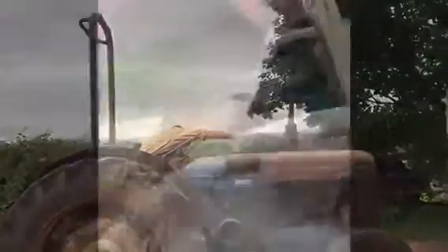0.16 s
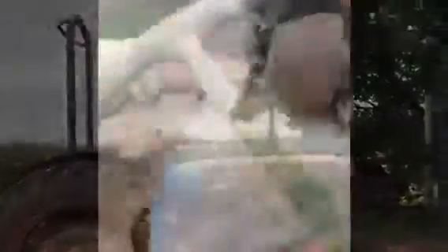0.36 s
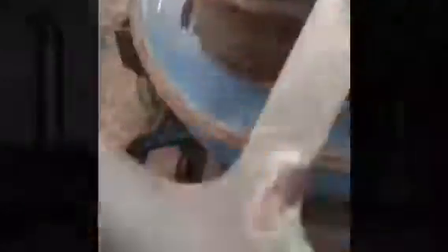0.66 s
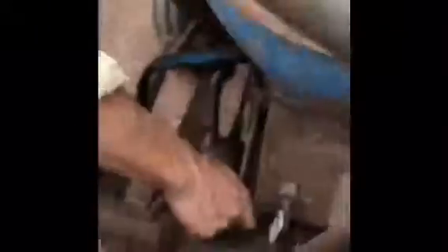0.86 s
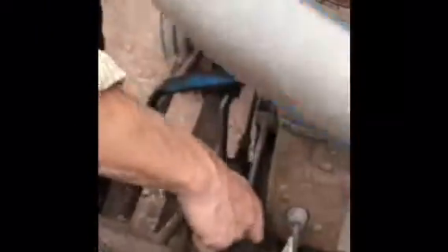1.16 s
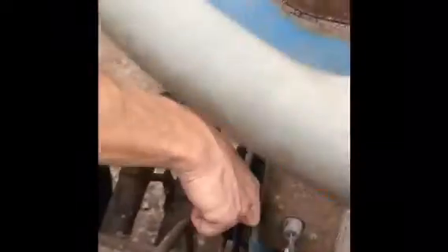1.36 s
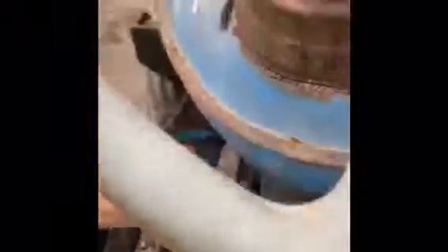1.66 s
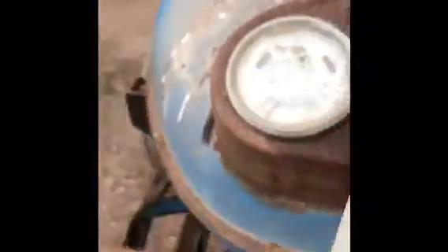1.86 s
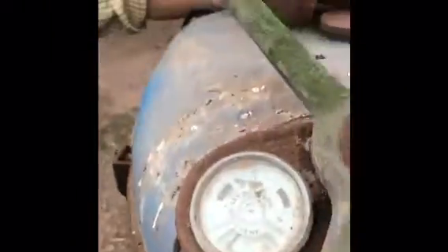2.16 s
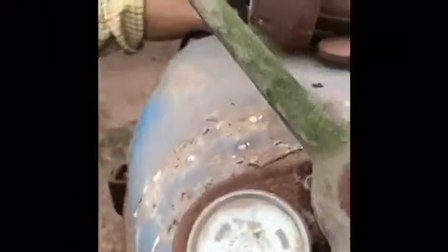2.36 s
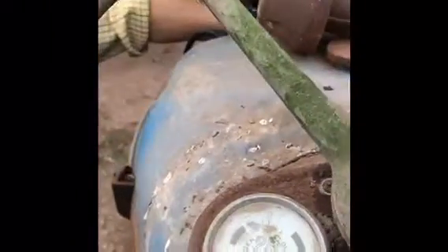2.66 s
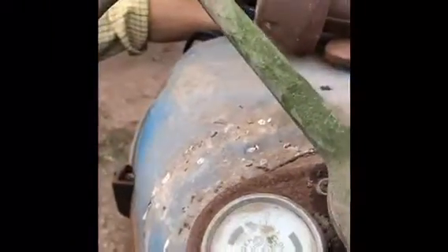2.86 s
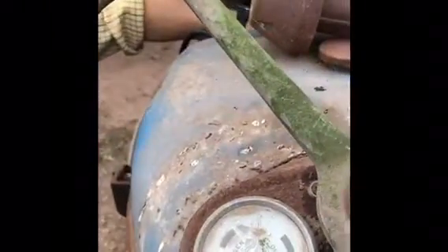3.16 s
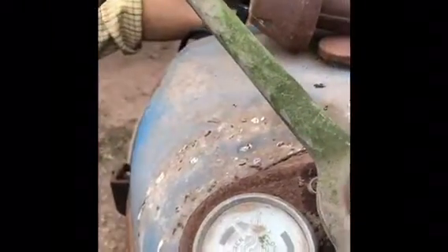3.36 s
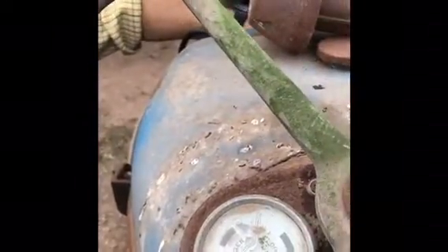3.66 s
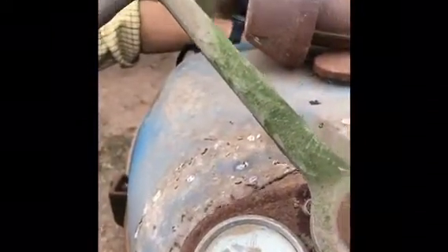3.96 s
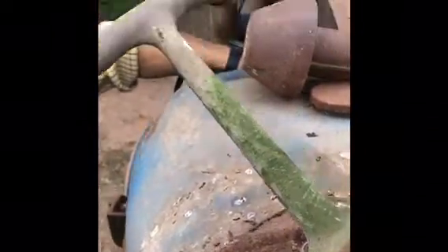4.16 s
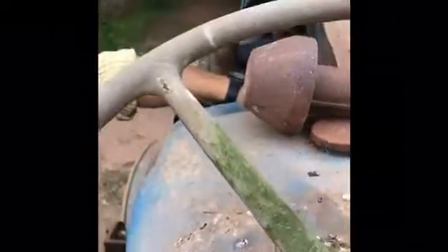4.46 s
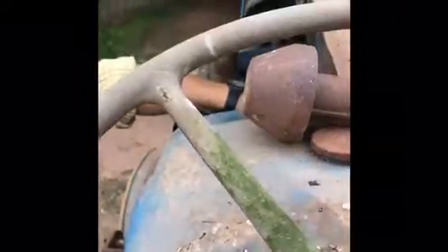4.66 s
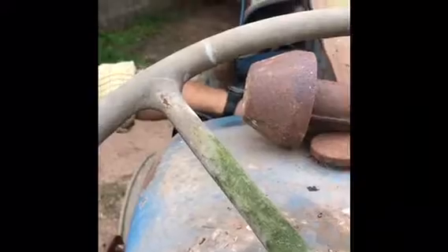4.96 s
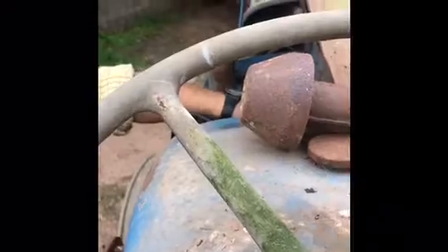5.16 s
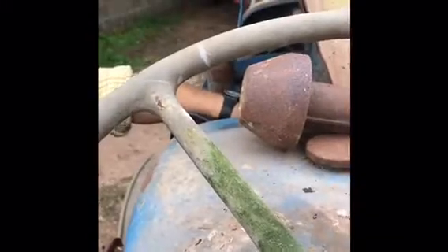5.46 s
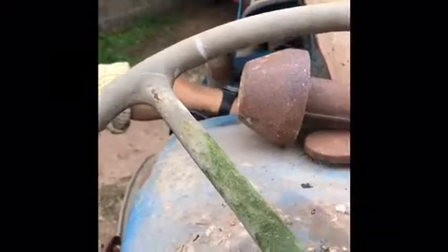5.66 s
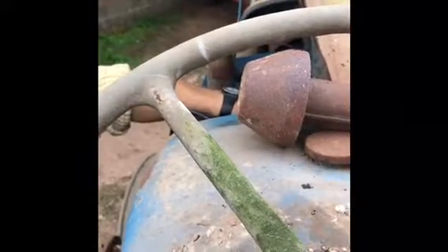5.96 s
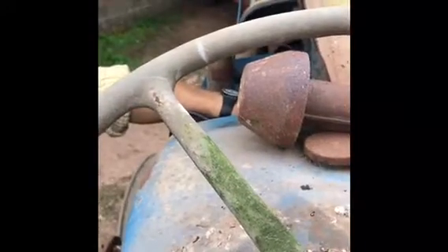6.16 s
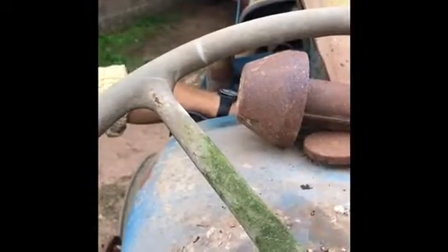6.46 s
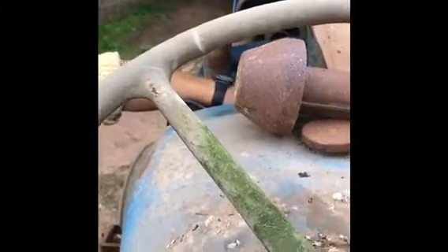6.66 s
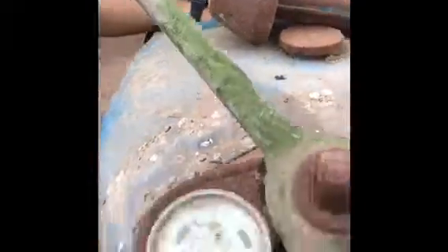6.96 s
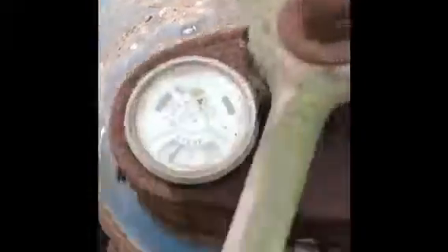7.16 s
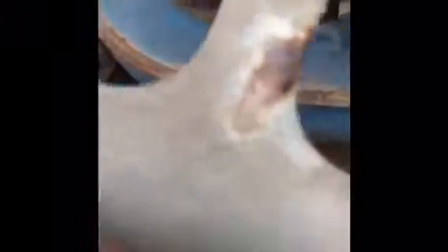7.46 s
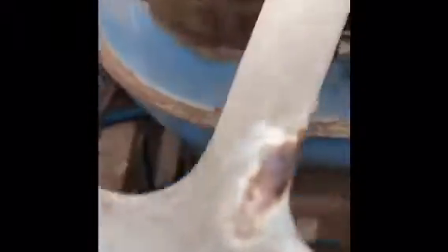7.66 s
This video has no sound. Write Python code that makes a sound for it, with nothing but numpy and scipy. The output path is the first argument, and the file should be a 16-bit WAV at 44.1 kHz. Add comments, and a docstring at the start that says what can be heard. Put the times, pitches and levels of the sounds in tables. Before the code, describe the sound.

An old tractor fails to start outdoors: a scraping lever, then brief bursts of starter whirr with clunks, iron hum and harsh gear grinding.

```python
"""A quiet farmyard, heard from the seat of an old tractor that is being tried on its starter.
A rusty lever scrapes, drops and bounces to rest. Again and again the starter clunks in, whirrs and
coasts down in the humming iron casing. Twice its pinion grinds loudly on the ring gear; dry teeth
squeal, small parts tick and a few compressions thud in the manifold. A small bird chirps far off."""
import sys
import numpy as np
from scipy import signal
from scipy.io import wavfile
from scipy.ndimage import uniform_filter1d

SR = 44100
rng = np.random.default_rng(int(sys.argv[2]) if len(sys.argv) > 2 else 0)


def store_wav(level_fs):
    """Save 16-bit WAV to argv[1]."""
    pcm = np.round(np.clip(np.atleast_2d(level_fs), -1, 1) * 32767)
    wavfile.write(sys.argv[1], SR, pcm.T.astype(np.int16))


N = 343523
TIME = np.arange(N) / SR
HZ = np.fft.rfftfreq(16384, 1 / SR)
TURNS_PER_S = 50  # armature speed under power

# The starter is switched on. Each row: start and length in seconds; relative levels in dB of gear whirr,
# brush rasp, low drone and upper drone; drop of whirr and rasp on release in dB; rasp fade and
# upper drone ring-out in dB per second.
TRIES = [(1.91, 0.33, -41, -53.5, -43, -33.5, 2.5, 18.5, 36),
         (2.695, .114, -38, -36, -37, -27.5, 12.5, 66, 30),
         (3.458, .52, -30, -43.5, -38, -26.5, 11, 27.5, 38),
         (5.322, .08, -32, -52, -35.5, -38, 6, 38.5, 31.5),
         (5.399, .71, -25.5, -40.5, -29.5, -30.5, 25, 47.5, 24),
         (7.461, 0.36, -28.5, -40.5, -36.5, -24, 10, 29, 36.5)]
# A piston comes over compression. Each row: start in seconds, peak in dB, centre pitch in Hz,
# length in seconds.
COMPRESSIONS = [(3.685, -27, 71, 0.21), (3.917, -26.5, 75, 0.16), (5.568, -30.5, 69, 0.18),
                (7.684, -26.5, 69, 0.66)]


def amp(db):
    """Decibels to gain."""
    return 10 ** (np.asarray(db) / 20)


def unit(x):
    """Scales to rms 1."""
    return x / np.sqrt(np.mean(x ** 2) + 1e-20)


def wobble(smoothing, n=N):
    """Random movement of rms 1, averaged over `smoothing` samples."""
    return unit(uniform_filter1d(rng.standard_normal(n), size=smoothing))


def curve(points, hz=HZ):
    """Joins (Hz, value) points along a log-frequency axis."""
    f, value = np.transpose(points)
    return np.interp(np.log(hz + 1), np.log(f + 1), value)


def add(mix, s, sound):
    """Mixes a sound in at s seconds."""
    part = mix[max(round(s * SR), 0):][:len(sound)]
    part += sound[:len(part)]


def envelope(start, length, db, rise_s, climb, fall, drop_db=0, release_s=0.018):
    """Attack, a sloping hold, then a quick drop and a steady fade; climb and fall are in dB per second."""
    held = np.clip(TIME - start, 0, length)
    after = np.maximum(TIME - start - length, 0)
    dropped_db = drop_db * (1 - np.exp(-after / release_s))
    return (1 - np.exp(-held / rise_s)) * amp(db + climb * held - fall * after - dropped_db)


def colour(x, db):
    """Minimum-phase EQ of unit energy: the dB curve sets only the tone."""
    log_gain = np.log(amp(np.maximum(db - db.max(), -100)))
    mirrored = np.concatenate([log_gain, log_gain[-2:0:-1]])
    response = np.fft.ifft(np.exp(np.conj(signal.hilbert(mirrored)))).real[:len(HZ) // 2]
    return signal.oaconvolve(x, response / np.linalg.norm(response))[:N]


def iron(x, eq, ring_db, thicket_db=-5, thicket_t60=0.082):
    """Sound passes through the castings: strong modes and a thicket of weak ones, over a broad EQ."""
    # Flywheel and bell housing ring. Each row: pitch in Hz, width in Hz, relative level in dB.
    modes = [(363, 30, -3), (550, 30, -7), (680, 35, -2), (888, 40, 2.5), (985, 40, -3), (1284, 40, 6),
             (1828, 26, -3), (2550, 44, -2), (3280, 65, 0), (3476, 45, -1), (3765, 50, -4), (3875, 80, -3),
             (4212, 70, -3), (4700, 100, -5)]
    peaks = sum(amp(db + ring_db) ** 2 / (1 + (2 * (HZ - hz) / width) ** 2) for hz, width, db in modes)
    thicket = rng.standard_normal(SR // 5) * amp(-60 * TIME[:SR // 5] / thicket_t60)
    rung = x + amp(thicket_db) * signal.oaconvolve(x, thicket / np.linalg.norm(thicket))[:N]
    return colour(rung, curve(eq) + 10 * np.log10(1 + peaks)) / np.hypot(1, amp(thicket_db))


def grit(per_s, spread_db, smooth):
    """Tiny metal contacts of uneven size over a share of even friction noise."""
    clicks = (rng.random(N) < per_s / SR) * rng.choice([-1., 1.], N)
    sizes = amp(spread_db * np.minimum(rng.exponential(1, N), 3))
    return unit(unit(clicks * sizes) + smooth * rng.standard_normal(N))


def blows(hits, rise_s, decay_s):
    """Each hit, given as (seconds, dB), is a short, dying chatter of contacts."""
    out, t = np.zeros(N), TIME[:SR // 5]
    shape = (1 - np.exp(-t / rise_s)) * np.exp(-t / decay_s)
    for s, db in hits:
        add(out, s, amp(db) * shape / shape.max() * rng.standard_normal(len(t)))
    return out


def switched_on(tries, hang_s=0):
    """True while the starter switch is held, and for hang_s afterwards."""
    return np.any([(TIME > s) & (TIME < s + length + hang_s) for s, length, *_ in tries], axis=0)


def background():
    """Outdoor air and low rumble, plus thin recorder hiss that cuts in and out around the later tries."""
    # Tone of the air and of the rumble. Each row: frequency in Hz, relative level in dB.
    air_eq = [(25, -16.5), (115, 3), (165, -14), (300, -14.5), (600, -24), (1000, -25), (1800, -37),
              (7000, -43), (16000, -50)]
    rumble_eq = [(25, -24), (62, -4.5), (105, -1), (170, -20.5), (400, -61)]
    air, rumble, hiss = rng.standard_normal((3, N))
    hiss_gate = uniform_filter1d(switched_on(TRIES[1:], hang_s=0.4).astype(float), size=220)
    bed = amp(-49.5) * colour(air, curve(air_eq)) + amp(-59) * colour(rumble, curve(rumble_eq))
    return bed + amp(-66) * hiss * hiss_gate


def lever(ring_hz=3524, ring_half_width_hz=210, catches_per_s=5.8, first_catch_s=0.15, catch_db=9):
    """A rusty lever scrapes along in uneven slips, singing where it catches; the linkage rubs."""
    # The lever slides. Each row: start and length in seconds, relative level in dB, sag in dB per second.
    strokes = [(0, 0.43, -31.5, 11.5), (0.478, 0.27, -35.5, 40.5)]
    # Tone of the scrape. Each row: frequency in Hz, relative level in dB.
    scrape_eq = [(18, -41), (30, -3), (112, -8), (227, -5.5), (374, -4), (702, -3.5), (2120, -9),
                 (3490, -5), (7670, -27.5), (12300, -40), (16000, -39)]
    # The linkage shudders. Each row: midpoint in seconds, relative level in dB, length in seconds.
    rubs = [(1.25, -56.5, 0.056), (1.583, -70, 0.15), (2.172, -39, 0.046), (4.099, -38.5, 0.12),
            (4.279, -35.5, 0.12), (4.41, -44, 0.15), (4.919, -56.5, 0.04), (4.992, -54, 0.06)]
    slips = amp(1.96 * wobble(900))
    push = sum(envelope(s, length, db, rise_s=0.0013, climb=-sag, fall=170)
               for s, length, db, sag in strokes)
    friction = grit(per_s=900, spread_db=-0.5, smooth=0.84) * slips * push
    scrape = iron(friction, scrape_eq, ring_db=-4, thicket_db=-7)
    catches = amp(catch_db * np.cos(2 * np.pi * catches_per_s * (TIME - first_catch_s)))
    resonance_db = -20 * np.log10(1 + ((HZ - ring_hz) / ring_half_width_hz) ** 2)
    ring = colour(rng.standard_normal(N) * push * catches, resonance_db)
    pressure = np.zeros(N)
    for s, db, length in rubs:
        add(pressure, s - length / 2, amp(db) * signal.windows.hann(int(length * SR)))
    rub_eq = [(150, -5), (300, 1.5), (1100, -2), (2000, -11), (3800, -11.5), (8000, -31.5), (16000, -48.5)]
    rubbing = colour(pressure * grit(per_s=3000, spread_db=2.5, smooth=0.7), curve(rub_eq))
    return amp(-1) * scrape + amp(-11) * ring + amp(3) * rubbing


def bounces(drop_s=0.622, first_hop_s=0.085, hop_share=0.87, first_db=-14.5, loss_db=9):
    """The dropped lever bounces to rest, each hop shorter and weaker: hits as (seconds, dB)."""
    return [(drop_s + first_hop_s * sum(hop_share ** j for j in range(k)), first_db - loss_db * k)
            for k in range(5)]


def knocks(body_dynamics=0.646):
    """Linkage and lever knock with a bright clack and a dull body; in light knocks the body takes over."""
    # The linkage knocks. Each row: start in seconds, relative level in dB.
    linkage_hits = [(.018, -21.5), (.474, -32), (.514, -21.5), (1.407, -44.5), (1.854, -47), (4.793, -48),
                    (7.311, -51)]
    # Tone of the clack. Each row: frequency in Hz, relative level in dB.
    clack_eq = [(120, -28), (200, -18), (612, -12.5), (1250, 3), (1980, -7), (2560, -5.5), (3560, -14),
                (4770, -17.5), (6280, -18), (16000, -35)]
    body_eq = [(150, -11), (350, -5), (1100, 1.5), (2500, -25), (8000, -52)]
    hits = linkage_hits + bounces()
    clack = colour(blows(hits, rise_s=0.0003, decay_s=0.013), curve(clack_eq))
    body_hits = [(s, body_dynamics * db) for s, db in hits]
    body = colour(blows(body_hits, rise_s=0.001, decay_s=0.0082), curve(body_eq))
    return amp(-4.5) * clack + amp(-20.5) * body


def ticks(count=12, gap_s=0.036, spread_db=1.5):
    """The starter switch sparks and small parts tick, singly or in faint, uneven rattles."""
    # Single sharp ticks. Each row: start in seconds, relative level in dB.
    singles = [(.506, -27.5), (.621, -27), (1.888, -41), (1.919, -30.5), (2.075, -26), (3.431, -21.5),
               (3.676, -30), (3.904, -23.5), (3.936, -23), (5.103, -47), (5.245, -48), (5.279, -40),
               (5.309, -39.5), (6.556, -53), (7.112, -61), (7.449, -31.5), (7.679, -29.5)]
    # Spells of loose ticking. Each row: start and length in seconds, relative level in dB.
    rattles = [(0.126, .27, -32.5), (5.021, .19, -50)]
    # Tone of the ticks. Each row: frequency in Hz, relative level in dB.
    tick_eq = [(600, 0), (2000, -5.5), (5000, 1), (7500, -0.5), (10000, -5), (13000, -2), (16000, -7)]
    loose = []
    for s, length, db in rattles:
        delays = gap_s * (np.arange(count) + rng.random(count))
        levels = db + spread_db * rng.standard_normal(count)
        loose += [(s + delay, level) for delay, level in zip(delays, levels) if delay < length]
    clicks = blows(singles, rise_s=0.0014, decay_s=0.0055) + blows(loose, rise_s=0.0006, decay_s=0.0025)
    return amp(-6) * colour(clicks, curve(tick_eq))


def bird():
    """A far-off bird: short buzzy chirps that narrow to one thin note."""
    # Each row: start in seconds, relative level in dB, pitch in Hz.
    chirps = [(1.572, -52, 7560), (1.718, -50.5, 7100), (4.45, -53, 7300), (4.99, -59, 7100),
              (6.759, -67, 7240)]
    out, t = np.zeros(N), TIME[:SR // 6]
    shape = (1 - np.exp(-t / 0.015)) * np.exp(-t / 0.039)
    for s, db, hz in chirps:
        buzz_hz = 700 * np.exp(-t / 0.09) * wobble(40, len(t))
        add(out, s, amp(db) * shape * np.sin(2 * np.pi * np.cumsum(hz + buzz_hz) / SR))
    return amp(2.5) * out


def armature_turns(coast_s=0.7):
    """Turns made by the armature: full speed under power, running down after each try."""
    spin = [(TIME >= s) * np.exp(-np.maximum(TIME - s - length, 0) / coast_s) for s, length, *_ in TRIES]
    return np.cumsum(TURNS_PER_S * np.max(spin, axis=0)) / SR


def starter(rise_s=0.0035, strain_delay_s=0.14, strain_width_s=0.05):
    """Gears whirr and brushes rasp, swelling once a turn and labouring just after a compression begins."""
    # Tone of the gears and of the brushes. Each row: frequency in Hz, relative level in dB.
    whirr_eq = [(150, -32.5), (310, -3.5), (420, -9.5), (480, -9), (750, -8), (1450, -10.5), (1750, -16.5),
                (2100, -28), (4000, -56.5)]
    rasp_eq = [(1200, -24.5), (2100, -4.5), (2600, 2), (3700, -2.5), (4800, -10), (6500, -16), (9000, -29),
               (11000, -38), (16000, -45)]
    gears, brushes = np.zeros((2, N))
    for s, length, whirr_db, rasp_db, _, _, drop_db, rasp_fade, _ in TRIES:
        gear_gain = envelope(s, length, whirr_db, rise_s, climb=1, fall=26, drop_db=drop_db)
        brush_gain = envelope(s, length, rasp_db, rise_s, climb=18, fall=rasp_fade, drop_db=drop_db)
        gears = np.where(TIME < s, gears, gear_gain)
        brushes = np.where(TIME < s, brushes, brush_gain)
    strain = sum(np.exp(-((TIME - s - strain_delay_s) / strain_width_s) ** 2) for s, *_ in COMPRESSIONS)
    strain *= switched_on(TRIES)
    churn_db = 1.3 * wobble(1300)  # the dry gears run unevenly
    turn = np.cos(2 * np.pi * armature_turns())
    gears *= amp(2.5 * strain + churn_db) * (1 + 0.067 * turn)
    brushes *= amp(4 * strain + churn_db) * (1 + 0.24 * turn)
    whirr = iron(grit(per_s=2000, spread_db=3, smooth=0.82) * gears, whirr_eq, ring_db=1.5, thicket_db=-6)
    rasp = iron(grit(per_s=3600, spread_db=3.5, smooth=0.24) * brushes, rasp_eq, ring_db=-0.5)
    # On the first try the starter spins free and sizzles.
    free_spin = envelope(*TRIES[0][:2], db=-57.5, rise_s=rise_s, climb=17, fall=29)
    sizzle_eq = [(2500, -10.5), (6000, -3.5), (9000, -14.5), (10500, -21)]
    sizzle = colour(rng.standard_normal(N) * free_spin, curve(sizzle_eq))
    return amp(1) * whirr + amp(-1) * rasp + sizzle


def boom(modes, evenness, free_waver=0.3, frame_hz=500):
    """Narrow modes waver while the starter shakes them, and ring on more purely once it is let go."""
    waver_clock = frame_hz * (1 + np.cumsum(np.where(switched_on(TRIES), 1, free_waver)) / SR)
    frames, ring = np.arange(frame_hz * (N // SR + 2)), np.zeros(N)
    for hz, width, db in modes:
        pole = np.exp(-2 * np.pi * width / frame_hz)
        shake = rng.standard_normal(len(frames)) + 1j * rng.standard_normal(len(frames))
        drift = signal.lfilter([1], [1, -2 * pole, pole * pole], shake)
        tone = np.interp(waver_clock, frames, drift) * np.exp(2j * np.pi * hz * TIME)
        ring += amp(db) * unit(tone.real)
    power = uniform_filter1d(uniform_filter1d(ring ** 2, size=3000), size=3000)
    return unit(ring / power ** (evenness / 2))  # partly levels out the swells


def casing(rise_s=0.03, low_fade_share=0.66):
    """Casing and bonnet drone along with each try and ring out, the low modes dying more slowly."""
    # Their booming modes. Each row: pitch in Hz, width in Hz, relative level in dB.
    low_modes = [(93.2, 14, -11.5), (111.9, 6.9, -8.5), (142.8, 6.7, 0)]
    upper_modes = [(177.5, 5.4, -6.5), (204.1, 6.5, -0.5), (229.4, 9.8, -5.5), (307.5, 11, -8),
                   (357, 14, -14), (684, 4.9, -19.5), (934, 8, -23.5), (977, 5.4, -23.5)]
    low_gain, upper_gain = np.zeros((2, N))
    for s, length, _, _, low_db, upper_db, _, _, ring_out in TRIES:
        low_swell = envelope(s, length, low_db, rise_s, climb=0, fall=low_fade_share * ring_out)
        upper_swell = envelope(s, length, upper_db, rise_s, climb=0, fall=ring_out, drop_db=1.5)
        low_gain = np.maximum(low_gain, low_swell)
        upper_gain = np.maximum(upper_gain, upper_swell)
    low = boom(low_modes, evenness=0.64) * low_gain
    upper = boom(upper_modes, evenness=0.43) * upper_gain
    return amp(-1.7) * low + amp(-1.3) * upper


def clunks(shelf_hz=2200):
    """The starter drive is thrown in and hits its stop; harder throws are brighter."""
    # Each row: start in seconds, relative level in dB, decay in seconds, treble shelf in dB.
    throws = [(1.912, -26.5, 0.0093, -10), (3.447, -18, 0.0086, -7.5), (5.333, -41, .012, -14.5),
              (5.405, -30, 0.012, -13.5), (7.462, -17, 0.0043, 11)]
    # Tone of a clunk before the shelf. Each row: frequency in Hz, relative level in dB.
    clunk_eq = [(71, -38), (120, -6), (300, -2.5), (546, -6), (684, 0.5), (1160, -4), (1290, -6),
                (1430, -19), (1650, -6), (1940, -19), (3590, -6.5), (5520, -22), (16000, -55)]
    out = np.zeros(N)
    for s, db, decay_s, treble_db in throws:
        tilted = [(hz, level + treble_db * hz ** 2 / (hz ** 2 + shelf_hz ** 2)) for hz, level in clunk_eq]
        out += iron(blows([(s, db)], rise_s=0.033, decay_s=decay_s), tilted, ring_db=3, thicket_db=-16.5)
    return amp(1.5) * out


def grind(teeth=11, jitter=0.25, bite=0.25, surges_per_s=9.3, surge_db=2.5, surge_delay_s=0.022):
    """Pinion teeth skip unevenly over the ring gear, each tearing off a burst of contacts."""
    # The teeth skid. Each row: start and length in seconds, relative level in dB, climb in dB per second.
    skids = [(2.721, 0.095, -20, 4.5), (5.598, 0.499, -23, 18.5)]
    # The pinion slams into the teeth. Each row: start in seconds, relative level in dB.
    slam_hits = [(2.737, 1), (2.748, 1), (2.762, -6.5), (2.78, 2), (2.801, -2), (5.605, -6.5), (5.653, -5),
                 (5.699, 1.5), (5.785, 2.5), (5.793, -3.5), (5.907, -0.5), (5.939, -1.5), (6.022, 1.5),
                 (6.094, -3)]
    # Tone of the grinding. Each row: frequency in Hz, relative level in dB.
    grind_eq = [(20, -43), (40, -26.5), (80, -10), (140, -6), (340, -3), (600, -0.5), (1000, -2.5),
                (1400, -4.5), (1800, -5.5), (2200, -9), (2550, 0.5), (3700, -2), (4900, -5.5), (6500, -9),
                (7600, -17), (16000, -20.5)]
    teeth_passed = np.cumsum(teeth * TURNS_PER_S * (1 + jitter * wobble(300))) / SR
    tooth_force = amp(2.4 * rng.standard_normal(N))[teeth_passed.astype(int) % N]
    chatter = unit(tooth_force * np.exp(-(teeth_passed % 1) / bite) * rng.standard_normal(N))
    pressure = np.zeros(N)
    for s, length, db, climb in skids:
        # The pinion rides in and out of the teeth.
        surge = amp(surge_db * np.cos(2 * np.pi * surges_per_s * (TIME - s - surge_delay_s)))
        pressure += surge * envelope(s, length, db, rise_s=0.0046, climb=climb, fall=521.5)
    slams = blows(slam_hits, rise_s=0.0023, decay_s=0.0062)
    return iron(chatter * pressure + amp(-9) * slams, grind_eq, ring_db=5, thicket_db=-7)


def thuds(glide=0.073):
    """Compressed air is let go into the manifold, which sounds one low, slightly rising note."""
    out = np.zeros(N)
    for s, db, hz, length in COMPRESSIONS:
        progress = np.linspace(0, 1, int(length * SR))
        swell = np.sin(np.pi * progress ** 0.39)
        cycles = hz * length * (progress + glide * (progress ** 2 - progress))
        add(out, s, amp(db) * swell * np.sin(2 * np.pi * cycles))
    return out


def squeals(length_s=0.056, waver_hz=110):
    """Dry teeth stick and slip for a moment on one wavering note."""
    # Each row: start in seconds, relative level in dB, pitch in Hz.
    notes = [(3.79, -37, 3620), (4.04, -46, 3950), (7.625, -39.5, 3530)]
    out, n = np.zeros(N), int(length_s * SR)
    for s, db, hz in notes:
        pitch = hz + waver_hz * wobble(90, n)
        add(out, s, amp(db) * signal.windows.hann(n) * np.sin(2 * np.pi * np.cumsum(pitch) / SR))
    return amp(6.5) * out


def walls(x, echoes_per_s=3000, predelay_s=0.006):
    """Scattered echoes from the bodywork and farm walls, each band dying at its own speed."""
    # Each row: frequency in Hz, seconds to fade by 60 dB.
    decay_times = [(100, .9), (330, 0.82), (900, 0.37), (2000, 0.16), (3500, 0.27), (16000, 0.23)]
    taps = rng.choice([-1., 1.], SR) * (rng.random(SR) < echoes_per_s / SR) * (TIME[:SR] > predelay_s)
    hz, t, bands = signal.stft(taps, SR, nperseg=256)
    fade = amp(-60 * t / curve(decay_times, hz)[:, None])
    tail = signal.istft(bands * fade, SR, nperseg=256)[1]
    return signal.oaconvolve(x, tail / np.linalg.norm(tail))[:N]


def scene():
    """The mono mix at the driver's seat; only the metal scrapes, hits and squeals feed the echoes."""
    metal = lever() + knocks() + grind() + clunks() + ticks() + squeals()
    return (metal + amp(-11) * walls(metal) + starter() + casing() + thuds() + bird() + background())[None]


def record(dry):
    """Soft clipping rounds off the loudest peaks, then a low-pass trims the very top."""
    ceiling, cutoff_hz = 1.05, 16100
    rounded = ceiling * np.tanh(dry / ceiling)
    low_pass = signal.firwin(511, cutoff_hz, window=("kaiser", 9), fs=SR)
    return signal.oaconvolve(rounded, low_pass[None], "same")


dry = scene()
out = record(dry)
store_wav(out)
```